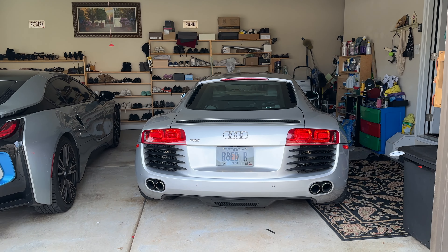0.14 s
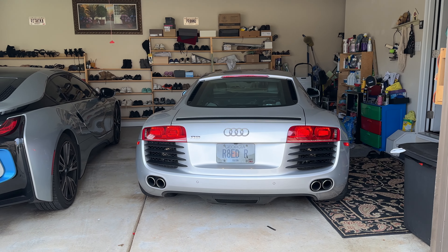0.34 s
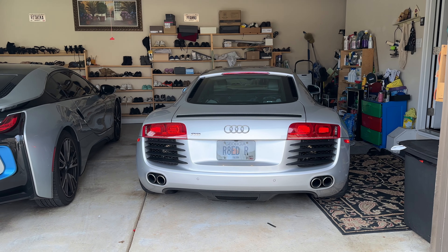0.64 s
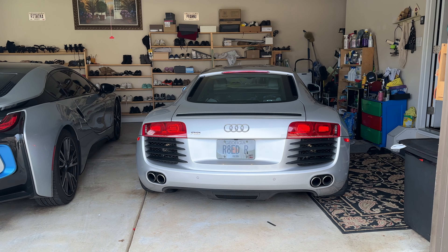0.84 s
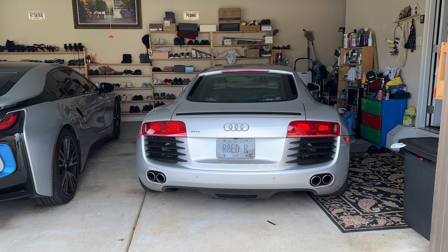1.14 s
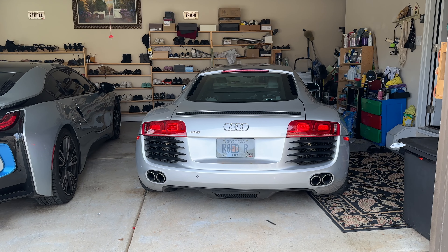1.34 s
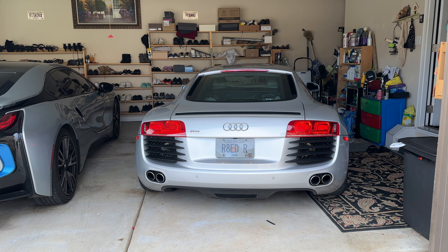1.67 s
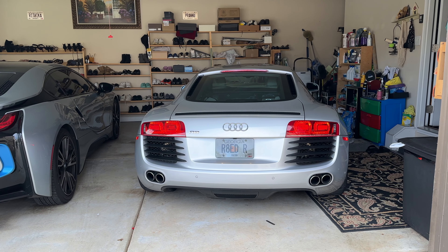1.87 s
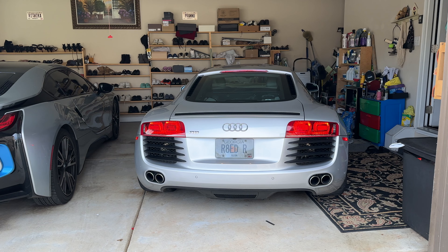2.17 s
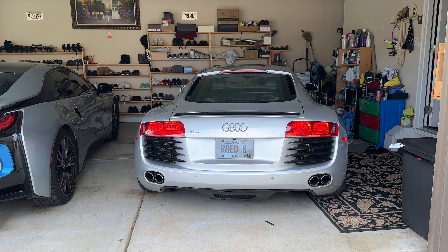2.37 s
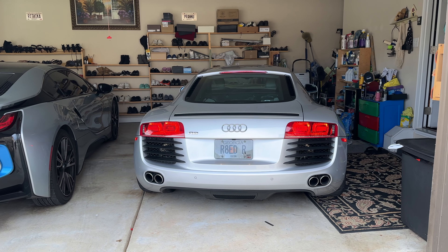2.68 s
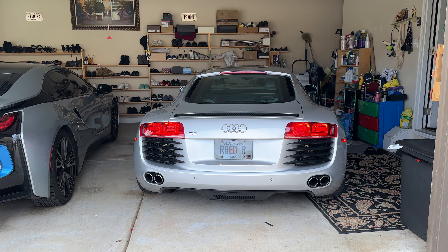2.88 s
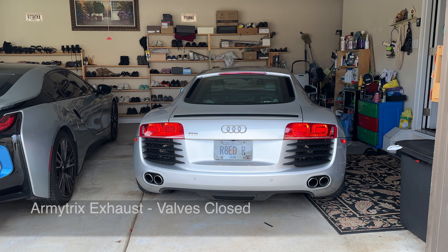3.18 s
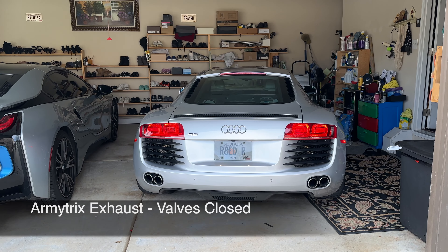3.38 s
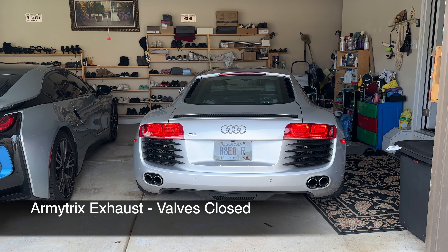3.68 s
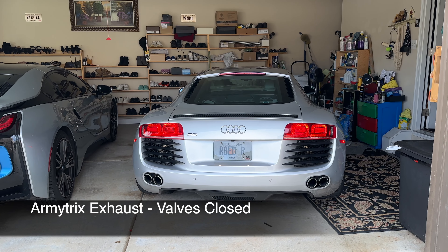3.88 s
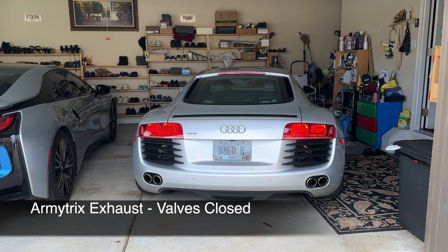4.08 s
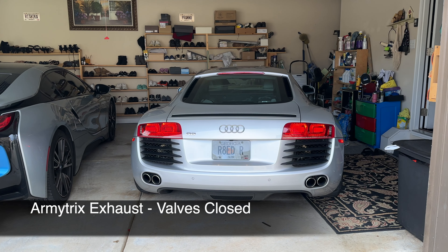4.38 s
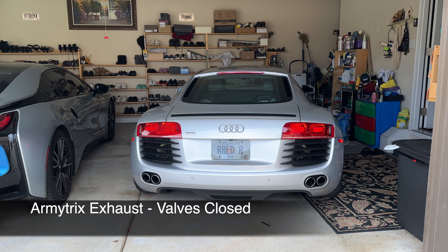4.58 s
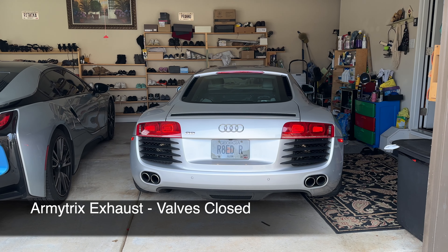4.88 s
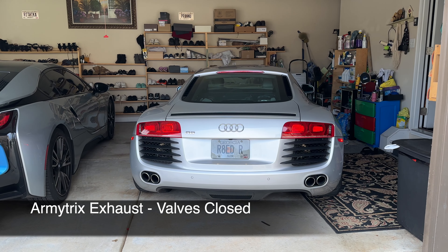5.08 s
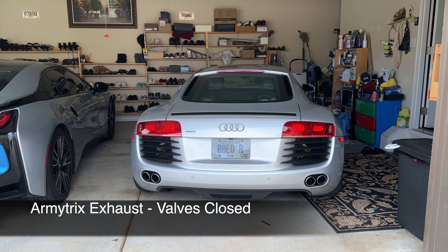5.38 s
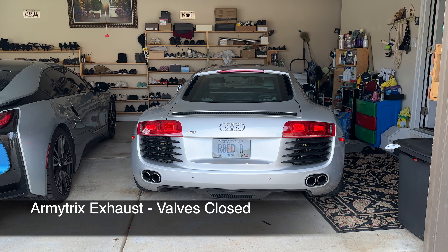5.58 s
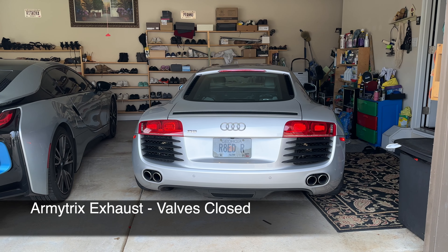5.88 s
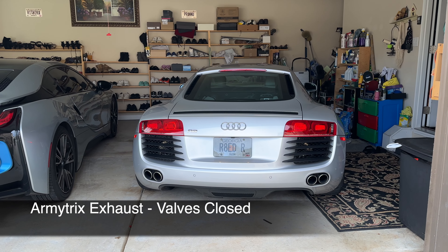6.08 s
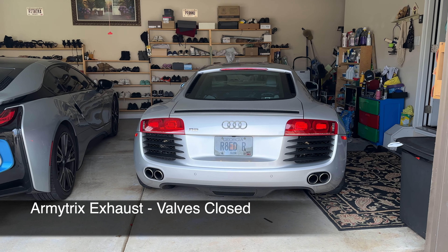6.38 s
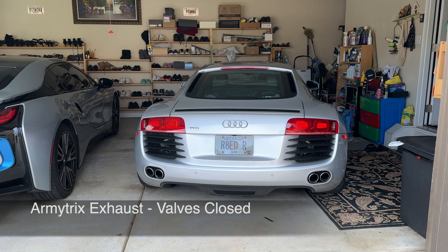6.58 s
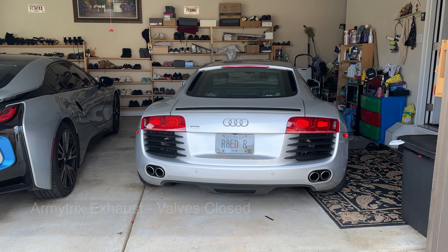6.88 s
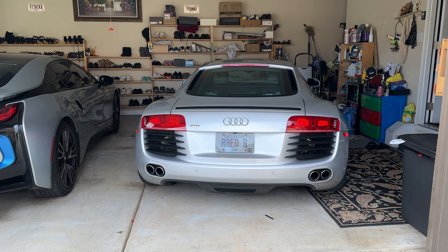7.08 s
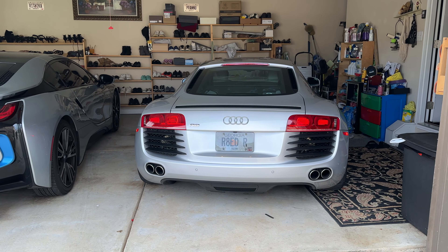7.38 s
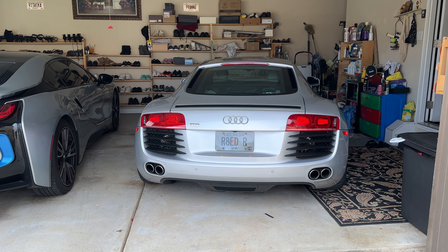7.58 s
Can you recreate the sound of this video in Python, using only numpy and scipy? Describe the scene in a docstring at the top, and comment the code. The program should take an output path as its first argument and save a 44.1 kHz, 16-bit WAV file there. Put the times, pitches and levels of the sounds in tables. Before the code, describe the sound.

A V8 sports car idles loudly in a garage, then sinks to a much quieter muffled idle with a brief hiss of air.

```python
"""In a garage, a few metres behind its tail pipes, a V8 sports car idles fast after a cold start.
Periodic firings give a drone of crank harmonics, unequal burns a burble, and turbulent hot gas a rasp
and sharp cracks in the resonant open pipes. Then the bypass valves shut, air hisses briefly through
the gap, and the engine sinks to a slow muffled idle over the ticking and whine of its own machinery."""
import sys
import numpy as np
from scipy import signal
from scipy.fft import rfft, irfft
from scipy.io import wavfile
from scipy.ndimage import uniform_filter1d

SR = 44100
rng = np.random.default_rng(int(sys.argv[2]) if len(sys.argv) > 2 else 0)


def wrap_up_sound(samples):
    """Save the sound to the file named by the first command line argument, as 16-bit audio."""
    columns = np.atleast_2d(samples).T
    # keep every value between -1 and 1, then stretch to whole-number steps
    tamed = np.clip(columns, -1, 1)
    steps = np.round(tamed * 32767).astype(np.int16)
    wavfile.write(sys.argv[1], SR, steps)


N = 341329
TIME = np.arange(N) / SR
CYLINDER_COUNT = 8
SHUT_AT_S, SHUT_TAKES_S, BASS_FADE_POWER = 3.28, 0.77, 0.87  # closing of the bypass valves


def undb(db):
    """Amplitude ratio of a level in decibels."""
    return 10 ** (np.asarray(db) / 20)


def unit(x):
    """Normalisation to rms 1."""
    return x / np.sqrt(np.mean(x ** 2))


def curve(table):
    """Linear interpolation of a table over time."""
    return np.interp(TIME, *np.transpose(table))


def across(points, hz):
    """Interpolation of a table over log frequency."""
    rows = np.array(points, float)
    return np.interp(np.log(hz + 1), np.log(rows[:, 0]), rows[:, 1])


def colour(x, points, modes=(), size=8192):
    """Minimum-phase filter: resonance peaks on a broad spectral envelope."""
    hz = np.arange(size // 2 + 1) * SR / size
    peaks_db = sum(lift / (1 + (2 * (hz - f) / width) ** 2) for f, width, lift in modes)
    cepstrum = irfft(np.log(undb(across(points, hz) + peaks_db)))
    cepstrum[1:size // 2] *= 2
    cepstrum[size // 2 + 1:] = 0
    return signal.oaconvolve(x, irfft(np.exp(rfft(cepstrum))))[:N]


def bandpass(x, edges_hz, order):
    """Maximally flat band-pass filter."""
    return signal.sosfilt(signal.butter(order, edges_hz, "bandpass", fs=SR, output="sos"), x)


def walk(rate_hz):
    """Slow random fluctuation: smoothed steps of rms 1."""
    hold = int(SR / rate_hz)
    steps = np.repeat(rng.standard_normal(N // hold + 1), hold)
    return unit(uniform_filter1d(uniform_filter1d(steps, hold), hold)[:N])


def pulses(times, sizes):
    """Impulse train, each impulse shared between two samples."""
    place = np.clip(times * SR, 0, N - 2)
    first = place.astype(int)
    part = place - first
    return np.bincount(first, sizes * (1 - part), N) + np.bincount(first + 1, sizes * part, N)


def decay(x, decay_s):
    """Exponential relaxation after each impulse."""
    return signal.lfilter([1], [1, -np.exp(-1 / (decay_s * SR))], x)


def puffs(times, sizes, decay_s, steady):
    """Amplitude-modulated noise: decaying bursts over a steady share."""
    gate = unit(decay(pulses(times, sizes), decay_s))
    return unit((gate + steady) * rng.standard_normal(N))


def strengths(times, pattern_db, scatter_db):
    """Cyclic variation: each firing's size is its cylinder's level plus random scatter."""
    return undb(np.resize(pattern_db, len(times)) + scatter_db * rng.standard_normal(len(times)))


def jitter(times, spread_s):
    """Normally distributed timing error."""
    return times + spread_s * rng.standard_normal(len(times))


def surge(hz, db_per_hz=0.2, fast_idle_hz=100):
    """Level follows flow: a faster engine pushes more gas through the open valves."""
    return undb(db_per_hz * (hz - fast_idle_hz))


def choke(db_per_s):
    """Throttling: the closing valves fade the open pipe's treble exponentially."""
    return undb(-db_per_s * np.maximum(TIME - SHUT_AT_S, 0))


# firing rate through a hunting fast idle, a run-down and a slow idle: t/s, f/Hz
FIRING_RATE = [(0.0, 99.92), (0.13, 99.19), (0.19, 100.63), (0.27, 100.33), (0.36, 96.98), (0.44, 101.41),
               (0.54, 98.64), (0.67, 101.48), (0.81, 100.31), (0.93, 100.98), (0.99, 102.33), (1.28, 99.45),
               (1.39, 100.77), (1.46, 101.24), (1.53, 98.59), (1.67, 100.62), (1.81, 97.76), (1.92, 100.62),
               (2.06, 99.04), (2.33, 100.15), (2.4, 101.58), (2.53, 99.31), (2.59, 99.02), (2.65, 96.89),
               (2.75, 100.68), (2.8, 99.41), (2.91, 100.85), (3.01, 98.31), (3.1, 101.86), (3.27, 99.56),
               (3.36, 102.75), (3.44, 100.39), (3.55, 100.76), (3.71, 99.39), (3.93, 95.98), (4.22, 94.16),
               (4.64, 87.45), (5.5, 76.92), (5.88, 70.68), (6.12, 68.05), (6.43, 62.83), (6.59, 61.19),
               (6.83, 57.3), (7.29, 53.54), (7.52, 55.41), (7.74, 53.53)]
def crank():
    """Phase is the integral of frequency: gives firing rate, engine cycles and firing times."""
    hz = curve(FIRING_RATE)
    firings = np.cumsum(hz) / SR - 0.2
    times = np.interp(np.arange(1, int(firings[-1])), firings, TIME)
    return hz, firings / CYLINDER_COUNT, times


# uneven banks make one lump a cycle, centred on one order; the muffler smears it
LOPE_AT_CYCLE, LOPE_ORDER, LOPE_SMEAR_RAD, LOPE_DEPTH = 0.5, 24, 0.27, 0.25
def harmonic(cycles, order, waver_db):
    """Dispersion: higher orders lag in the pipes; those between firing harmonics add up to a lope."""
    lag = np.pi / 6 * (order / CYLINDER_COUNT) ** 2
    if order % CYLINDER_COUNT:
        offset = order - LOPE_ORDER
        lag += 2 * np.pi * LOPE_AT_CYCLE * offset + LOPE_SMEAR_RAD * offset ** 2
    return np.sqrt(2) * undb(waver_db * walk(12)) * np.cos(2 * np.pi * order * cycles - lag)


# harmonics of the engine cycle, valves open and shut: order, level/dB before surge or boom
OPEN_ORDERS = [(4, -49), (6, -50), (8, -12.4), (9, -42), (10, -30), (12, -49), (13, -39), (14, -44),
               (15, -37), (16, -26.5), (18, -38.5), (19, -41), (22, -44), (24, -27.5), (26, -40), (29, -50),
               (32, -48), (42, -53), (56, -51.5)]
SHUT_ORDERS = [(8, -21.5), (10, -48), (12, -37.5), (13, -44), (14, -44), (16, -26.5), (19, -44), (20, -38),
               (21, -46), (22, -39), (23, -43), (24, -31), (26, -41.5), (28, -44), (29, -45), (30, -44),
               (32, -39.5), (38, -42.5), (40, -40)]
# boom of muffler and garage, which swells each order sinking through it: f/Hz, gain/dB
BOOM_RESPONSE = [(54, -14.5), (70, -18), (82, -18), (92, -4.5), (108, 2), (122, .5), (140, -8.5),
                 (165, -21.5), (190, -14.5), (215, -12), (245, -6.5), (280, -12), (305, -22), (350, -18.5),
                 (400, -33), (450, -23)]
def drone(cycles, hz, valve):
    """Harmonic series of the crank: it wavers with gusts in the open pipe and lopes in the muffler."""
    gusty_cycles = cycles + .0006 * walk(25)
    opened = sum(undb(db) * harmonic(gusty_cycles, round(order), waver_db=min(order / 15, 2.2))
                 for order, db in OPEN_ORDERS)
    lump = 1 + LOPE_DEPTH * np.cos(2 * np.pi * (cycles - LOPE_AT_CYCLE))
    shut = 0
    for order, db in SHUT_ORDERS:
        boom_db = across(BOOM_RESPONSE, hz * order / CYLINDER_COUNT)
        size = undb(db + boom_db) * (lump if order == LOPE_ORDER else 1)
        shut = shut + size * harmonic(cycles, order, waver_db=.8)
    return valve ** BASS_FADE_POWER * surge(hz) * opened + np.sqrt(1 - valve) * shut


# bass response of the exhaust, valves open and shut: f/Hz, gain/dB
OPEN_BASS = [(25, -77.5), (50, 3), (70, -6.5), (108, 5), (138, 5), (185, 3), (230, 13.5), (262, 4),
             (310, 13.5), (360, 2), (440, -21.5), (650, -42.5), (2000, -87.5)]
SHUT_BASS = [(25, -17), (70, -4), (100, -6), (135, -2), (160, -5), (205, 1.5), (245, -3.5), (290, -9),
             (345, -10.5), (400, -30.5), (600, -67), (2000, -100)]
# resonances of the muffler: f/Hz, width/Hz, gain/dB
MUFFLER_PEAKS = [(282, 16, 3), (442, 38, 6.5), (730, 31, 3.5), (1147, 98, 7.5), (1620, 220, 1.5)]
def burble(times, valve, open_db=-32, shut_db=-42.7):
    """Random excitation: unequal burns ring the open exhaust; the muffler evens them to a rumble."""
    sizes = strengths(times, [0], scatter_db=1.5)
    opened = unit(colour(pulses(times, sizes - sizes.mean()), OPEN_BASS)) * undb(open_db)
    shut = unit(colour(rng.standard_normal(N), SHUT_BASS, MUFFLER_PEAKS)) * undb(shut_db)
    return valve ** BASS_FADE_POWER * opened + np.sqrt(1 - valve) * shut


def firing(times, sizes, front, gas, decay_s, steady):
    """Blowdown: a rounded pressure front with a puff of turbulence behind it."""
    return unit(colour(pulses(times, sizes), front)) + gas * puffs(times, sizes, decay_s, steady)


# cylinders in firing order: relative level/dB shut, relative level/dB open, muffler delay/s
CYLINDER_BALANCE = [(4, 2, 0), (6, 0.5, .0012), (-1, 1, .0004), (-1, 0, .0018), (3, 1, .0007),
                    (-3, -5, .0015), (0, 2.5, .0002), (4, 1, .001)]
SHUT_PATTERN_DB, OPEN_PATTERN_DB, MUFFLER_DELAY_S = np.transpose(CYLINDER_BALANCE)
# spectrum of a pressure front, open and further rounded by the muffler: f/Hz, level/dB
OPEN_FRONT = [(900, 0), (2500, -8), (6000, -24), (15000, -45)]
SHUT_FRONT = [(600, 0), (1200, -8), (2500, -24), (15000, -60)]
# upper response of the exhaust, valves open and shut: f/Hz, gain/dB
OPEN_TREBLE = [(200, -5.5), (400, -4.5), (500, 1.5), (600, -9.5), (760, -7.5), (860, -13.5), (1080, -9),
               (1450, -14.5), (1750, -18.5), (2500, -17), (3000, -22.5), (4500, -29), (15000, -54)]
SHUT_TREBLE = [(200, -4.5), (390, -5), (480, 5.5), (570, -8.5), (750, -5), (900, -10.5), (1700, -12),
               (2400, -19.5), (3500, -22.5), (6000, -49), (15000, -80.5)]
# resonances of the tail pipes: f/Hz, width/Hz, gain/dB
PIPE_PEAKS = [(702, 36, 3), (962, 60, 7), (1160, 110, 5.5), (1525, 120, 5.5), (2010, 100, 2.5),
              (2370, 170, 3.5), (2570, 150, 4.5)]
# muffler flow eases as the engine coasts, then rises to hold the slow idle: t/s, level/dB
MUFFLER_FLOW = [(4.25, -48.5), (4.8, -51), (6.2, -52.5), (7.0, -52.5), (7.7, -49.5)]
def rasp(times, hz, valve, open_db=-36.5):
    """Source and filter: firings excite the tail pipes, or the muffler once the valves shut."""
    open_times = jitter(times, .00035)
    shut_times = times + np.resize(MUFFLER_DELAY_S, len(times))
    open_sizes = strengths(times, OPEN_PATTERN_DB, scatter_db=1.3)
    shut_sizes = strengths(times, SHUT_PATTERN_DB, scatter_db=1.3)
    opened = firing(open_times, open_sizes, OPEN_FRONT, gas=7, decay_s=.005, steady=.7)
    shut = firing(shut_times, shut_sizes, SHUT_FRONT, gas=6.5, decay_s=.008, steady=2.2)
    opened = unit(colour(opened, OPEN_TREBLE, PIPE_PEAKS)) * undb(open_db) * surge(hz)
    shut = unit(colour(shut, SHUT_TREBLE, MUFFLER_PEAKS)) * undb(curve(MUFFLER_FLOW))
    return choke(db_per_s=20) * opened + np.sqrt(1 - valve) * shut


# modes of the thin pipe metal: f/Hz, T60/s, level/dB with valves open
WALL_MODES = [(960, .08, -51.5), (1105, .04, -52.5), (1165, .045, -52), (2380, .03, -57),
              (2570, .03, -54.5)]
def pipe_ticks(times):
    """Damped modal vibration: each firing knocks the pipe wall, favouring different modes each time."""
    out = 0
    for hz, t60, db in WALL_MODES:
        sizes = strengths(times, OPEN_PATTERN_DB, scatter_db=4)
        knocks = pulses(jitter(times, .0004), sizes)
        pole = np.exp((2j * np.pi * hz - np.log(1000) / t60) / SR)
        out = out + undb(db) * unit(signal.lfilter([1], [1, -pole], knocks).imag)
    return out * choke(db_per_s=40)


# edges of the bands in which the gas spits independently: f/Hz
SPIT_BANDS = (2000, 3500, 5200, 7800, 11000, 17000)
# spectrum of the spitting gas: f/Hz, level/dB
SPIT_SPECTRUM = [(1500, -27.5), (3000, -4), (3800, 4), (4900, -5.5), (6000, 1.5), (7400, -3.5), (9200, -10),
                 (10400, -5.5), (11500, -14.5), (14500, -14.5), (16000, -21.5)]
def spit(times, open_db=-49):
    """Jet noise: bursts of fast gas, each with its own colour, until the valves choke them."""
    gas = 0
    for band in zip(SPIT_BANDS, SPIT_BANDS[1:]):
        sizes = strengths(times, OPEN_PATTERN_DB / 2, scatter_db=2.6)
        bursts = puffs(jitter(times, .001), sizes, decay_s=.005, steady=.9)
        gas = gas + bandpass(bursts, band, order=4)
    return unit(colour(gas, SPIT_SPECTRUM)) * undb(open_db) * choke(db_per_s=23)


# spectrum of the ticking and tones of the belt-driven parts: f/Hz, level/dB
TICK_SPECTRUM = [(600, -10.5), (2000, 11), (3300, 5), (5000, 1.5), (7300, -3.5), (9000, -8), (10000, 1),
                 (11500, -6.5), (15500, -18.5)]
PULLEY_TONES = [(743, -73), (1152, -76), (2121, -80)]
def machinery(times, tick_db=-66):
    """Impact and rotation noise: injectors and valve gear tick with the firings; pulleys whine."""
    sizes = strengths(times, [0], scatter_db=2.5)
    ticks = puffs(times, sizes, decay_s=.012, steady=1.3)
    out = unit(colour(ticks, TICK_SPECTRUM)) * undb(tick_db)
    for hz, db in PULLEY_TONES:
        turns = np.cumsum(hz + 6 * walk(40)) / SR
        out = out + np.sqrt(2) * undb(db + 2.5 * walk(20)) * np.sin(2 * np.pi * turns)
    return out


def garage(x, wet_db=-4.5, t60_s=0.36, paths=4):
    """Reverberation: dense reflections from walls, floor and shelves, in a slowly shifting pattern."""
    age = TIME[:SR // 2]
    shares = np.array([walk(4) for _ in range(paths)])
    out = 0
    for share in shares / np.linalg.norm(shares, axis=0):
        tail = rng.standard_normal(len(age)) * undb(-60 * age / t60_s) * (age > .004)
        out = out + share * signal.oaconvolve(x, tail / np.linalg.norm(tail))[:N]
    return undb(wet_db) * out


# hard firings in the open pipes: t/s, relative level/dB, brightness/dB
HARD_FIRINGS = [(0.3237, -25, -12), (0.8036, -26, -10), (0.8724, -24, -13), (1.0301, -27, -15),
                (1.1089, -27, -14), (1.3887, -26, -18), (1.4282, -26, -10), (1.6686, -22, -14),
                (2.7242, -26, -11), (3.1926, -26, -20)]
def cracks(gas=0.14, split_hz=1900, treble_lift_db=11.5):
    """Impulse response: a steep front and a short burst of gas ring the pipes with a metallic tick."""
    times, db, bright_db = np.transpose(HARD_FIRINGS)
    treble_db = db + bright_db + treble_lift_db
    out = 0
    for band, band_db in (([850, split_hz], db), ([split_hz, 3000], treble_db)):
        fronts = pulses(times, undb(band_db))
        burst = decay(fronts, decay_s=.005) * rng.standard_normal(N)
        out = out + bandpass(fronts + gas * burst, band, order=2)
    ring = colour(out, OPEN_TREBLE, PIPE_PEAKS)
    return ring / np.abs(ring).max() * undb(db.max() - 1.5)


# spectrum of the escaping air: f/Hz, level/dB
AIR_SPECTRUM = [(2000, -12), (4000, 2), (5800, -0.5), (7000, 0), (9400, 2), (11300, -5.5), (12700, -5.5),
                (16000, -7.5)]
# whistling resonances of the narrowing gap and of the leak: f/Hz, width/Hz, gain/dB
GAP_PEAKS = [(6850, 400, 6), (9300, 600, 4), (12400, 700, 4)]
LEAK_PEAKS = [(13510, 130, 13)]
def hiss(valve, start_s=4.0, attack_s=0.015, hold_s=0.35, rush_db=-58.5, leak_db=-70):
    """Orifice noise: air spurts as the valves seat, then dies away to a faint whistling leak."""
    age = np.maximum(TIME - start_s, 0)
    spurt_db = 4 * np.exp(-age / .025)
    fall_db = 18 * age + 57 * np.maximum(age - hold_s, 0)  # a slow sag, then a fast release
    rush = np.clip(age / attack_s, 0, 1) * undb(rush_db - fall_db + spurt_db)
    leak = (1 - valve) * undb(leak_db - 9 * age)
    flutter_db = 1.2 * walk(40)
    gap = unit(colour(rng.standard_normal(N), AIR_SPECTRUM, GAP_PEAKS))
    seat = unit(colour(rng.standard_normal(N), AIR_SPECTRUM, LEAK_PEAKS))
    return (rush * gap + leak * seat) * undb(flutter_db)


# side signal by frequency: little in the bass, almost none at 2-5 kHz, strong near 7-9 kHz: f/Hz, side gain/dB
STEREO_WIDTH = [(60, -29.5), (200, -16), (380, -13.5), (700, -5.5), (1300, -9), (2000, -30.5), (5000, -50),
                (6200, -32.5), (7200, 5), (8800, 17.5), (10200, -10), (12000, -26.5), (15000, -2)]
# the exhaust is a little louder on the left: f/Hz, level difference/dB
LEFT_EXCESS = [(60, .9), (200, 1.1), (700, 2.4), (1290, 2.7), (2000, .1), (15000, 0)]
def scene():
    """Superposition: the sources, driven by one crank and the bypass valves, add to their echoes."""
    hz, cycles, times = crank()
    valve = np.clip(1 - (TIME - SHUT_AT_S) / SHUT_TAKES_S, 0, 1)  # 1 open, 0 shut
    low = drone(cycles, hz, valve) + burble(times, valve)
    high = rasp(times, hz, valve) + pipe_ticks(times) + cracks()
    high = high + spit(times) + hiss(valve) + machinery(times)
    mid = low + high + garage(high)
    side = colour(garage(mid), STEREO_WIDTH)
    lean = undb(across(LEFT_EXCESS, np.fft.rfftfreq(N, 1 / SR)) / 2)
    left = irfft(rfft(mid) * lean, N) + side
    right = irfft(rfft(mid) / lean, N) - side
    return np.array([left, right])


def record(dry, notch_hz=(7850, 8800), top_hz=15750):
    """Band limiting: a narrow notch in the treble and a steep cut at the top."""
    notch = signal.butter(4, notch_hz, "bandstop", fs=SR, output="sos")
    top = signal.ellip(8, .2, 70, top_hz, fs=SR, output="sos")
    return signal.sosfilt(np.vstack([notch, top]), dry)


dry = scene()
out = record(dry)
wrap_up_sound(out)
```